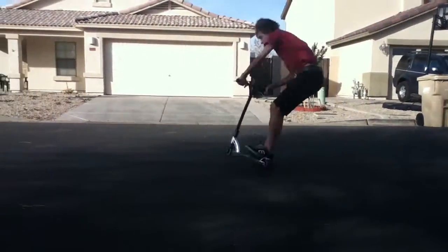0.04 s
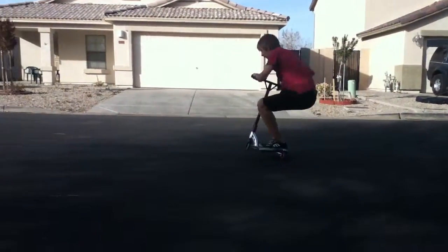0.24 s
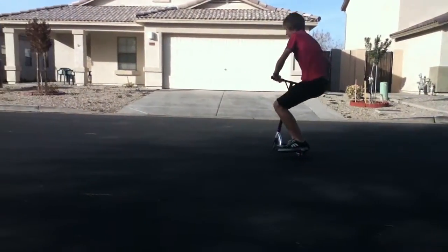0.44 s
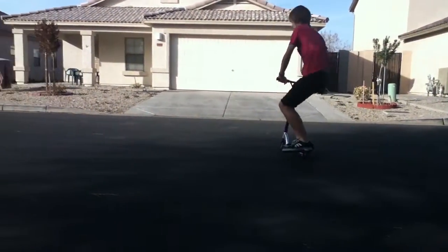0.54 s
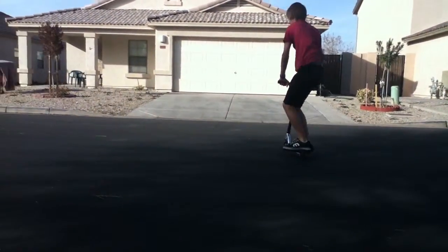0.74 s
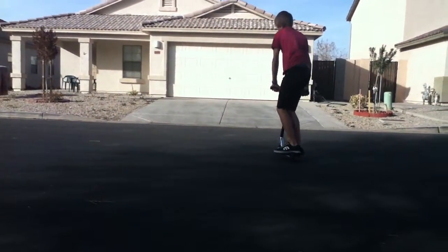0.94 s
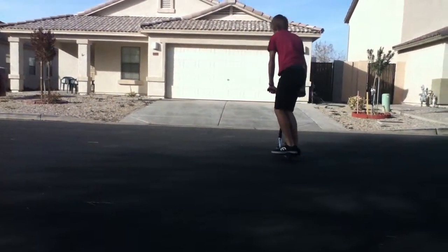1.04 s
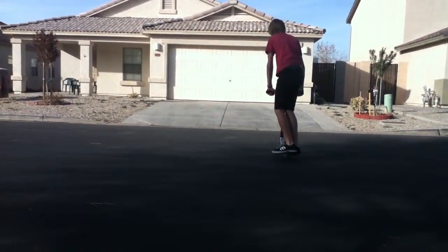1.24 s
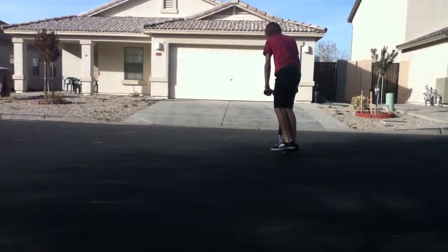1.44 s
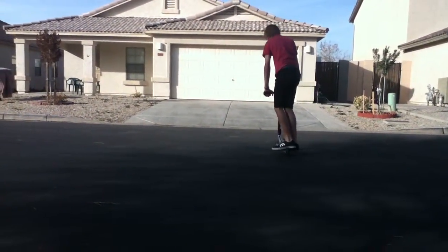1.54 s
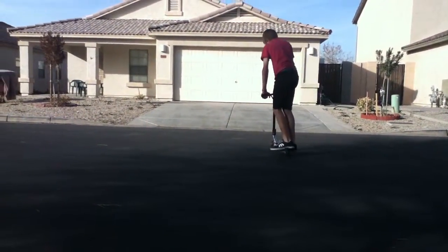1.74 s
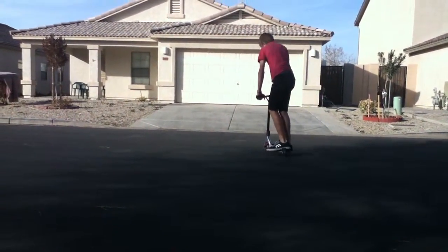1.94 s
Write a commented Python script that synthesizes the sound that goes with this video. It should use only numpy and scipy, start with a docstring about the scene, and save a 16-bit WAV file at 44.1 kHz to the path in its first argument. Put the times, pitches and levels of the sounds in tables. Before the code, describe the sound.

A kick scooter's wheels whirr faintly in the air, then it lands on asphalt at about 0.2 seconds with a loud clatter and thud. A second sharp clack follows at 0.3 seconds, leaving a faint metallic ring and a short echo off houses. From around 0.8 seconds it rolls on quietly with a brief tyre scuff, a soft hum and scattered ticks, with slight wind puffs near 1.3 and 1.7 seconds.

```python
"""A faint whirr of free-spinning wheels is heard first, as a kick scooter drops out of a jump.
It lands on asphalt in a quick run of impacts that excite the modes of its frame and loose parts.
The rider's weight thuds on the deck, and a last sharp clack leaves the metal handlebar ringing.
The houses of the quiet street reflect the blows; the scooter rolls on, humming and ticking, in light wind."""
import sys
import numpy as np
from scipy import signal
from scipy.fft import rfft, irfft
from scipy.io import wavfile

SR = 44100
rng = np.random.default_rng(int(sys.argv[2]) if len(sys.argv) > 2 else 0)


def waveform_to_disk(signal):
    """Save audio, clipped to [-1, 1], as 16-bit WAV at the path in sys.argv[1]."""
    frames = np.transpose(np.atleast_2d(signal))
    scaled = np.clip(frames, -1, 1) * 32767
    samples = np.round(scaled).astype(np.int16)
    wavfile.write(sys.argv[1], SR, samples)


N = 88200
TIME = np.arange(N) / SR
BAND_EDGES_HZ = np.geomspace(20, 17000, 25)
CONTACT_S = .0005  # rise time of a blow


def landing():
    """Impact excitation: the wheels slam down, loose parts rattle, and frame and deck ring."""
    # blows of the landing: (time [s], clatter level [dB], frame level [dB])
    blows = [(.2030, -6.5, -3), (.2050, 0.5, -1.5), (0.2104, -1.5, -4.5), (0.2147, -2.5, -8.5),
             (0.2199, -2, -7), (.2240, -9, -6.5), (0.2287, -14, -8), (.237, -13.5, -15.5), (.244, -16, -19),
             (0.246, -15.5, -30), (.259, -16.5, -25.5), (.273, -18.5, -14.5), (0.281, -24, -28),
             (0.288, -22, -19)]
    # spectrum of the loose parts: (frequency [Hz], level [dB])
    rattle_spectrum = [(70, -45), (150, -32.5), (330, -24), (520, -26), (1000, -21.5), (1800, -20),
                       (3000, -20.5), (4500, -18.5), (6200, -22), (8000, -22), (10500, -25), (12500, -33.5),
                       (16000, -37.5)]
    # their damping: (frequency [Hz], T60 [s])
    rattle_t60 = [(150, .06), (1000, 0.028), (4000, 0.024), (12000, 0.024)]
    # modes of deck and frame: (frequency [Hz], level [dB], T60 [s])
    frame_modes = [(300, -21, 0.058), (407.2, -30, .07), (692, -29, .1), (786, -19, 0.043),
                   (1057, -22, 0.027), (1206, -29.5, 0.079), (1457, -30.5, 0.15), (1656, -29, 0.05),
                   (1880, -31, 0.037), (2100, -24.5, 0.042), (2934, -31.5, .07), (3047, -30, 0.05),
                   (4460, -27.5, 0.079), (5186, -35.5, 0.042)]
    # wheels hitting the ground: (time [s], level [dB], frequency [Hz], T60 [s])
    slams = [(0.2026, -12, 399.3, 0.011), (0.2037, -5, 1020, .014)]
    # the rider's weight on the deck: (time [s], level [dB], frequency [Hz], T60 [s])
    thuds = [(.211, -24.5, 201, .07), (0.2365, -19, 187, .04), (0.2339, -27, 134, 0.083)]
    rattle = clatter([(s, db) for s, db, _ in blows], rattle_spectrum, rattle_t60)
    frame = strike([(s, db) for s, _, db in blows], frame_modes)
    return rattle + frame + sum(ring(*impact) for impact in slams + thuds)


def last_clack():
    """Free vibration: the second wheel claps down, and the lightly damped bar outlasts the fork."""
    # contacts of the wheel: (time [s], level [dB])
    clacks = [(.3135, -5), (.3168, -3.5), (.3188, -1.5), (.3212, -6.5)]
    # modes of wheel and fork: (frequency [Hz], level [dB], T60 [s])
    fork_modes = [(122, -30, 0.043), (244, -28.5, 0.068), (357.6, -23.5, 0.078), (695, -28.5, 0.074),
                  (1148, -24.5, 0.025), (1437, -13.5, 0.013), (1582, -23, 0.029), (2340, -21, 0.013),
                  (4540, -23, .025), (4700, -25.5, 0.015), (5336, -40, 0.099)]
    # modes of the handlebar tube, one close pair beating: (frequency [Hz], level [dB], T60 [s])
    bar_modes = [(326, -46.5, .8), (1190, -49, 0.527), (1370, -45.5, 0.38), (4339, -46.5, 0.63),
                 (4341, -53.5, 0.61), (4800, -56, .33), (5720, -47.5, 0.31)]
    # spectrum of the fork's clatter: (frequency [Hz], level [dB])
    fork_spectrum = [(100, -50), (300, -56.5), (800, -37), (1400, -27.5), (2800, -34), (4500, -27.5),
                     (6500, -34.5), (9000, -37.5), (12500, -43), (16000, -48)]
    # its damping: (frequency [Hz], T60 [s])
    fork_t60 = [(150, 0.033), (1500, 0.015), (10000, 0.024)]
    struck_s = .3168
    ringing = sum(ring(struck_s, db, hz, t60) * (-1) ** k  # modes alternate in polarity
                  for k, (hz, db, t60) in enumerate(fork_modes + bar_modes))
    return ringing + clatter(clacks, fork_spectrum, fork_t60)


def ticks():
    """Contact transients: fittings and grit each give a noisy scratch and a shorter damped ring."""
    # small contacts: (time [s], ring level [dB], frequency [Hz], scratch T60 [s])
    contacts = [(0.052, -30.5, 1450, 0.013), (0.072, -37, 1110, .006), (0.172, -24.5, 1001, 0.0072),
                (.952, -44.5, 3910, 0.019), (.992, -50, 4490, 0.014), (0.983, -54.5, 1002, 0.036),
                (1.36, -52.5, 3593, .01), (1.44, -52, 4500, .012), (1.477, -56, 2950, .008),
                (1.747, -42, 1300, 0.0073), (1.918, -52, 4400, 0.014), (1.945, -57, 4600, 0.017)]
    scratch_db, spread = -6, 2 ** .4  # relative to the ring; 0.4 octave to either side
    out = 0
    for s, db, hz, t60 in contacts:
        scratch = decay(s, t60, CONTACT_S) * band_noise(hz / spread, hz * spread)
        out = out + ring(s, db, hz, .4 * t60) + from_db(db + scratch_db) * scratch
    return out


def wheels():
    """Friction noise: bearings whirr until touchdown; later a tyre scuffs and grinds briefly."""
    # free-spinning wheels: (frequency [Hz], level [dB])
    whirr_spectrum = [(100, -63.5), (200, -62), (330, -59.5), (480, -68.5), (750, -53), (1000, -61.5),
                      (1400, -51.5), (2800, -60), (4500, -57.5), (6200, -62.5), (9000, -59), (12500, -61),
                      (16000, -65.5)]
    # the tyre scuffing as the rider straightens: (frequency [Hz], level [dB])
    scuff_spectrum = [(200, -87), (800, -66), (2000, -73), (4000, -63.5), (8000, -70), (15000, -74)]
    # the tyre grinding: (frequency [Hz], level [dB])
    grind_spectrum = [(120, -80), (320, -76), (500, -71), (800, -64), (2000, -72), (4500, -71.5),
                      (9000, -98)]
    touchdown_s, fade_s = .21, .05
    airborne = np.exp(-np.maximum(TIME - touchdown_s, 0) / fade_s)
    whirr = airborne * noise(whirr_spectrum)
    scuff = swell(centre_s=.791, width_s=.011) * noise(scuff_spectrum)
    grind = swell(centre_s=.835, width_s=.038) * noise(grind_spectrum)
    return whirr + scuff + grind


def deck_hum():
    """Forced vibration: the turning wheels drive two resonances of the deck."""
    # deck resonances: (frequency [Hz], bandwidth [Hz], level [dB])
    resonances = [(321.4, 50, -67.5), (739, 90, -71)]
    # rise and fall of the hum: (time [s], gain [dB])
    contour = [(0, 2), (.2, 8.5), (.45, 9.5), (.6, 4.5), (.72, -22), (.83, 14.5), (.92, -7), (1.4, -5),
               (1.65, 1), (1.85, -5.5), (2, 4)]
    hum = sum(from_db(db) * band_noise(hz - width / 2, hz + width / 2, settle_samples=N)
              for hz, width, db in resonances)
    return hum * gain_curve(contour)


def houses(sound):
    """Reverberation: house fronts scatter the sound back, the high frequencies dying first."""
    # strength of the reflections: (frequency [Hz], gain [dB])
    reflection_gains = [(70, -20), (130, -10), (220, -15.5), (330, -11.5), (520, -15), (1000, -19.5),
                        (1600, -17.5), (3000, -15.5), (4500, -22.5), (7000, -21.5), (14000, -28)]
    # reverberation time: (frequency [Hz], T60 [s])
    reverb_t60 = [(120, 1.2), (330, 0.82), (800, 0.77), (2500, .62), (5000, .5), (10000, .35)]
    response = 0
    for hz, band in noise_bands():
        tail = band * decay(start_s=.026, t60=at_hz(reverb_t60, hz), rise_s=.029)
        spectrum_share = hz * np.log(BAND_EDGES_HZ[1] / BAND_EDGES_HZ[0]) / (SR / 2)
        tail *= np.sqrt(spectrum_share / np.sum(tail ** 2))  # about unit gain within the band
        response = response + from_db(at_hz(reflection_gains, hz)) * tail
    return signal.fftconvolve(sound, response)[:N]


def street():
    """Broadband ambient noise of air and rolling, with two puffs of turbulence at the microphone."""
    # street air and rolling wheels: (frequency [Hz], level [dB])
    air_spectrum = [(25, -66.5), (55, -64), (110, -61.5), (200, -65), (330, -68), (500, -73.5), (750, -71),
                    (1200, -75.5), (2500, -75), (5000, -74.5), (10000, -74.5), (12500, -69), (15000, -69.5)]
    # preset swell of the background hiss, as of a recorder's gain recovering: (time [s], gain [dB])
    gain_recovery = [(0, -7), (.6, -3), (1.1, -2.5), (1.4, -1.5), (1.7, -0.5), (2, 0)]
    # puffs of wind: (time [s], width [s], level [dB])
    gusts = [(1.33, 0.023, -46), (1.693, 0.021, -44.5)]
    # rumble of the wind: (frequency [Hz], relative level [dB])
    wind_spectrum = [(22, -3), (35, -2), (55, 3), (85, -14), (150, -28), (400, -58)]
    out = gain_curve(gain_recovery) * noise(air_spectrum)
    wind = noise(wind_spectrum)
    for s, width_s, db in gusts:
        envelope = swell(s, width_s)
        puff = envelope * wind
        out += from_db(db) * puff * envelope.std() / puff.std()
    return out


def ring(start_s, db, hz, t60):
    """Damped oscillation of one struck mode."""
    return from_db(db) * np.cos(2 * np.pi * hz * (TIME - start_s)) * decay(start_s, t60, .28 / hz)


def strike(hits, modes):
    """Modal superposition: every hit feeds energy into all the modes of a body."""
    return sum(from_db(db) * hit_envelope(hits, t60) * np.sin(2 * np.pi * (hz * TIME + rng.random()))
               for hz, db, t60 in modes)


def clatter(hits, spectrum, t60s):
    """Modal overlap: a crowd of short-lived modes merges into decaying bands of noise."""
    return sum(from_db(at_hz(spectrum, hz)) * hit_envelope(hits, at_hz(t60s, hz)) * band
               for hz, band in noise_bands())


def hit_envelope(hits, t60):
    """Incoherent addition: the decays of all hits (time [s], level [dB]) sum in energy."""
    one_hit = decay(0, t60, CONTACT_S)
    energy = np.zeros(N)
    for s, db in hits:
        start = int(s * SR)
        energy[start:] += (from_db(db) * one_hit[:N - start]) ** 2
    return np.sqrt(energy)


def decay(start_s, t60, rise_s):
    """Exponential damping after a quick rise: 60 dB of fall in t60 seconds."""
    age = np.maximum(TIME - start_s, 0)
    return (1 - np.exp(-age / rise_s)) * np.exp(-np.log(1000) * age / t60)


def swell(centre_s, width_s):
    """A Gaussian rise and fall."""
    return np.exp(-.5 * ((TIME - centre_s) / width_s) ** 2)


def band_noise(low_hz, high_hz, order=2, settle_samples=0):
    """Band-pass filtering of white noise, scaled to unit rms."""
    bandpass = signal.butter(order, [low_hz, high_hz], "band", fs=SR, output="sos")
    band = signal.sosfilt(bandpass, rng.standard_normal(N + settle_samples))[-N:]
    return band / band.std()


def noise_bands():
    """A constant-Q filter bank: yield (centre [Hz], noise) across the audible range."""
    for low, high in zip(BAND_EDGES_HZ, BAND_EDGES_HZ[1:]):
        yield np.sqrt(low * high), band_noise(low, high, order=3, settle_samples=SR // 2)


def noise(spectrum):
    """Spectral shaping: steady noise with the given band levels."""
    return sum(from_db(at_hz(spectrum, hz)) * band for hz, band in noise_bands())


def at_hz(points, hz):
    """Interpolation on a logarithmic frequency axis."""
    freqs, values = np.transpose(points)
    return np.interp(np.log(hz), np.log(freqs), values)


def gain_curve(points):
    """Interpolation of (time [s], gain [dB]) into an amplitude envelope."""
    return from_db(np.interp(TIME, *np.transpose(points)))


def from_db(db):
    """Decibels to amplitude ratio."""
    return 10 ** (np.asarray(db) / 20)


def scene():
    """Superposition of the impacts, their reflections, the rolling and the street, in mono."""
    impacts = landing() + last_clack() + ticks()
    return (impacts + houses(impacts) + wheels() + deck_hum() + street())[None]


def record(dry):
    """Limited bandwidth: the microphone dulls the top octave and cuts the very top steeply."""
    shelf_hz, shelf_db, cutoff_hz = 10900, -5, 15800
    hz = np.fft.rfftfreq(2 * N, 1 / SR)
    above_shelf = 1 / (1 + (shelf_hz / np.maximum(hz, 1000)) ** 40)
    dulled = irfft(rfft(dry, 2 * N) * from_db(shelf_db * above_shelf))[:, :N]
    lowpass = signal.ellip(12, .1, 80, cutoff_hz, fs=SR, output="sos")
    return signal.sosfilt(lowpass, dulled)


dry = scene()
out = record(dry)
waveform_to_disk(out)
```